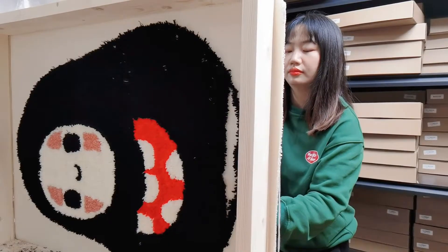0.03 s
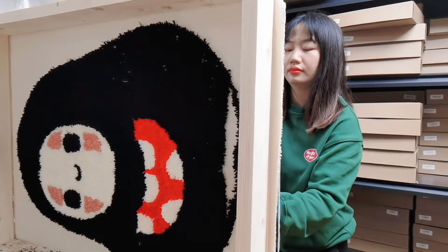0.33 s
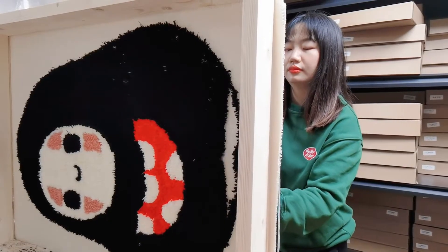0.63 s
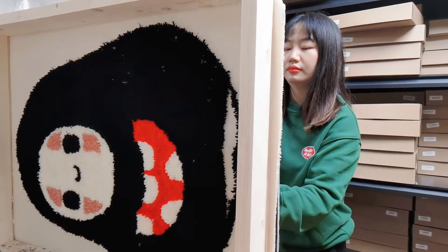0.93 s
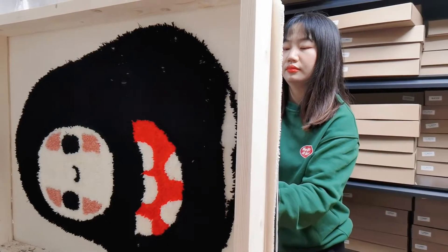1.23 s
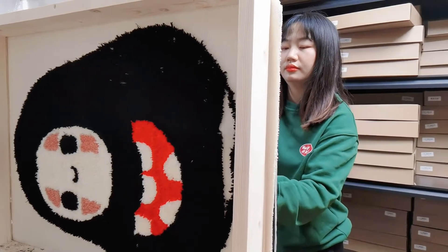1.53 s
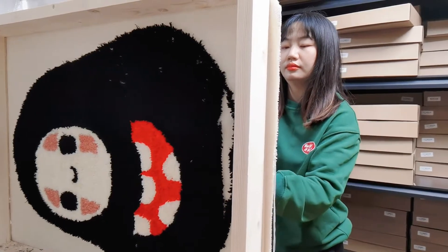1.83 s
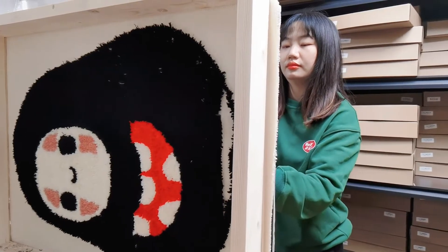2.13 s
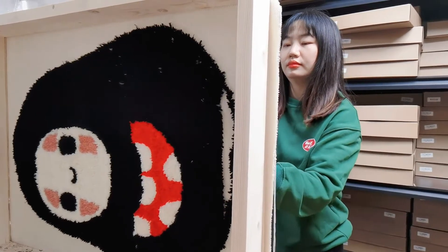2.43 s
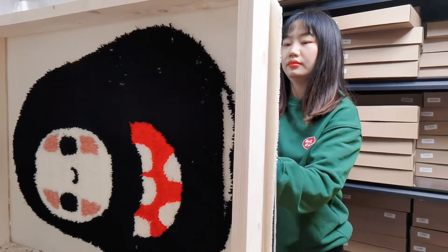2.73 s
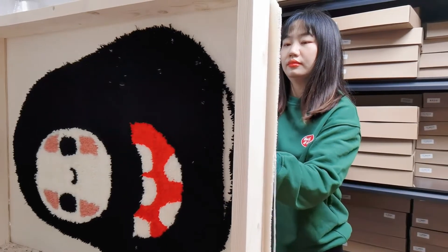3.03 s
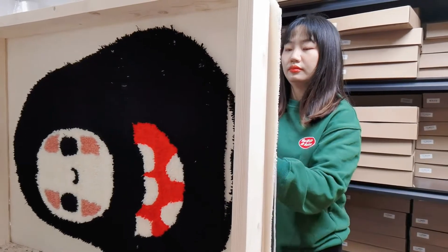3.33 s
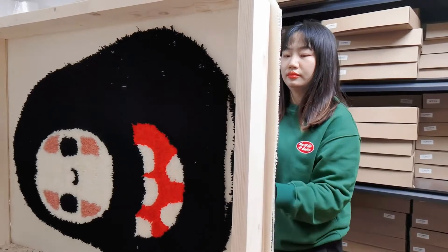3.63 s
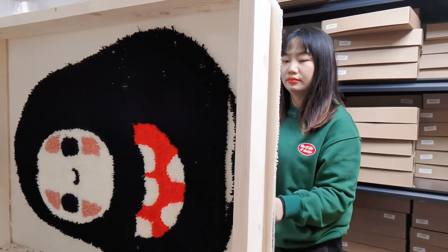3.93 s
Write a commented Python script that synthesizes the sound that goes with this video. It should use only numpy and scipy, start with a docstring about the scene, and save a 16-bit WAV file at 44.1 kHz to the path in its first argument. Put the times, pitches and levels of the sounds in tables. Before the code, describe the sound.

An electric tufting gun thumps and rattles rapidly, then stops dead with a knock.

```python
"""Rapid thumping and rattling, about 14 strokes a second: an electric tufting gun in a small room.
Each stroke punches yarn through cloth on a wooden frame, draws short whines from the gears,
clacks the linkage and snips the yarn, over a whirring motor. The gun knocks a few times,
bumps the frame and stops dead near 3.1 s with a brief steel ring; faint handling taps follow."""
import sys
import numpy as np
from scipy import signal
from scipy.fft import rfft, irfft
from scipy.io import wavfile
from scipy.ndimage import uniform_filter1d

SR = 44100
rng = np.random.default_rng(int(sys.argv[2]) if len(sys.argv) > 2 else 0)


def materialize(psi):
    """Save the field psi as 16-bit PCM at rate SR to the path in sys.argv[1].

    A 1-D psi becomes a single channel; in a 2-D psi each row is a channel.
    """
    bounded = np.clip(np.atleast_2d(psi).T, -1, 1)
    quanta = np.round(bounded * 32767).astype(np.int16)
    wavfile.write(sys.argv[1], SR, quanta)


N = 176400
STALL_S, STOP_S, RUN_DOWN_S = 3.08, 3.118, 0.0056


def undb(db):
    """Decibels to gain."""
    return 10 ** (np.asarray(db) / 20)


def unit(x):
    """Scale to rms 1."""
    return x / np.sqrt(np.mean(x ** 2))


def curve(table, column=1):
    """One table column, interpolated over time."""
    rows = np.array(table)
    return np.interp(np.arange(N) / SR, rows[:, 0], rows[:, column])


def colour(x, points):
    """Minimum-phase filter through (Hz, dB) points."""
    size = 2048
    rows = np.array(points)
    hz = np.maximum(np.arange(size // 2 + 1) * SR / size, 1)
    gain_db = np.interp(np.log(hz), np.log(rows[:, 0]), rows[:, 1])
    cepstrum = irfft(np.log(undb(gain_db)))
    cepstrum[1:size // 2] *= 2
    cepstrum[size // 2 + 1:] = 0
    return signal.fftconvolve(x, irfft(np.exp(rfft(cepstrum))))[:len(x)]


def noise(points):
    """Coloured noise, rms 1."""
    return unit(colour(rng.standard_normal(N), points))


def puffs(envelope, points):
    """Noise under an envelope, coloured afterwards so dull sounds start softly."""
    white = rng.standard_normal(N)
    return colour(envelope * white, points) / np.std(colour(white, points))


def band(x, hz, width_hz):
    """One resonance, gain 1 at centre."""
    return signal.lfilter(*signal.iirpeak(hz, hz / width_hz, fs=SR), x)


def tone(hz):
    """Sine along a pitch curve, rms 1."""
    return np.sqrt(2) * np.sin(2 * np.pi * np.cumsum(hz) / SR)


def walk(rate_hz):
    """Smooth random drift, rms 1."""
    span = max(int(SR / rate_hz), 1)
    return unit(uniform_filter1d(uniform_filter1d(rng.standard_normal(N), span), span))


def burst(t, start_s, decay_s):
    """Sudden start, exponential fade."""
    return (t >= start_s) * np.exp(-np.maximum(t - start_s, 0) / decay_s)


def near(stroke, phase):
    """Signed distance in strokes to a phase (0 to 1) of the cycle."""
    return (stroke - phase + .5) % 1 - .5


def bell(stroke, phase, width):
    """Smooth swell around one phase of each stroke."""
    return np.exp(-.5 * (near(stroke, phase) / width) ** 2)


def accent(stroke, spread_db):
    """Random gain, held for each stroke."""
    gains = undb(spread_db * rng.standard_normal(N // 100))
    return gains[np.floor(stroke + .1).astype(int)]


# Background spectrum. Each row: frequency in Hz, relative level in dB.
ROOM_TONE_SPECTRUM = [(18, -37.5), (30, -6), (75, -1), (176, -15), (426, -26), (597, -31.5), (1300, -35.5),
                      (2700, -43), (15000, -51)]

def room_tone():
    """Faint low rumble, mostly common to both ears."""
    common = noise(ROOM_TONE_SPECTRUM)
    return undb(-70) * np.array([common + .4 * noise(ROOM_TONE_SPECTRUM) for _ in range(2)])


def tail(t, t60_s):
    """Dense decaying echoes, unit energy."""
    age_s = t[:SR // 2]
    echoes = rng.standard_normal(len(age_s)) * np.exp(-np.log(1000) * age_s / t60_s) * (age_s > .002)
    return echoes / np.sqrt(np.sum(echoes ** 2))


# Long-tail filter. Each row: frequency in Hz, relative gain in dB.
BOOM_SPECTRUM = [(60, 5), (170, -5.5), (300, -4), (900, -1), (2000, -13), (8000, -43.5)]

def boom(x, t):
    """The room's long, dull tail."""
    return undb(-22) * colour(signal.fftconvolve(x, tail(t, t60_s=0.77))[:N], BOOM_SPECTRUM)


# Reflection filter. Each row: frequency in Hz, relative gain in dB.
WALL_SPECTRUM = [(40, -27.5), (140, -16), (300, -11), (600, -5), (1400, 0), (3000, 3), (6000, 9),
                 (15000, 10)]

def walls(x, t, parts=1):
    """Short bright tail; each part of the gun has its own paths to the walls."""
    part = rng.integers(0, parts, N)
    wet = sum(signal.fftconvolve(x * (part == k), tail(t, t60_s=0.21))[:N] for k in range(parts))
    return undb(-1.5) * colour(wet, WALL_SPECTRUM)


# Handling taps. Each row: start in seconds, level in dB, decay in seconds.
TAPS = [(3.284, -50, 0.024), (3.335, -54, 0.014), (3.367, -49.5, 0.017), (3.445, -46, 0.011),
        (3.525, -59, 0.018), (3.565, -55.5, 0.029), (3.592, -67, 0.058)]
# Gun ticks. Each row: start in seconds, level in dB.
TICKS = [(3.648, -72), (3.747, -68)]
# Their spectra. Each row: frequency in Hz, relative level in dB.
TAP_SPECTRUM = [(50, 12), (150, 13), (250, -6), (450, 1), (900, -7), (1500, -18), (2200, -33), (8000, -60)]
TICK_SPECTRUM = [(800, -3), (1800, -12), (2400, 1), (3300, -17.5), (5500, -6), (8000, -31), (16000, -30)]

def handling(t):
    """Handling the stopped gun gives soft taps, then two small ticks."""
    taps = sum(undb(db) * burst(t, start_s, decay_s) for start_s, db, decay_s in TAPS)
    ticks = sum(undb(db) * burst(t, start_s, decay_s=0.00206) for start_s, db in TICKS)
    return puffs(taps, TAP_SPECTRUM) + puffs(ticks, TICK_SPECTRUM)


# Needle bar modes. Each row: frequency in Hz, level in dB, T60 in seconds.
BAR_MODES = [(1270, -37, .2), (2520, -48.5, 0.23), (3560, -42, .21), (3620, -47, .22), (5470, -44.5, .11),
             (5940, -35.5, 0.14), (5990, -43.5, .11)]

def needle_bar(t, start_s=3.117):
    """The jolt of the stop leaves the steel ringing briefly."""
    return sum(undb(db) * burst(t, start_s, t60_s / np.log(1000)) * tone(hz * (1 + .002 * walk(140)))
               for hz, db, t60_s in BAR_MODES)


# Motor whines. Each row: time in seconds, lower pitch in Hz, its relative level in dB,
# upper pitch in Hz, its relative level in dB.
MOTOR_WHINES = [(0, 2105, -48.5, 2900, -48), (1.65, 2121, -43.5, 2870, -49), (1.9, 2121, -45, 2905, -36),
                (2.3, 2120, -45, 2917, -37), (2.7, 2118, -39, 2965, -37), (3.1, 2110, -40.5, 2975, -38.5)]

def motor():
    """Two thin, wavering whines that grow in the second half."""
    lower = tone(curve(MOTOR_WHINES, 1) * (1 + .002 * walk(60))) * undb(curve(MOTOR_WHINES, 2))
    upper = tone(curve(MOTOR_WHINES, 3) * (1 + .007 * walk(150))) * undb(curve(MOTOR_WHINES, 4))
    flutter = unit(undb(3.1 * walk(40)))
    return (lower + upper) * flutter


# Running levels. Each row: time in seconds, then relative level in dB of cloth thump, gear whine,
# linkage rattle, frame buzz, frame ring, metal ring.
RUN_LEVELS = [(0, -2.5, -33, -28.5, -35.5, -2, -38), (.7, -2, -33, -30, -36, -2, -40.5),
              (1.3, -3, -33.5, -29, -34.5, -2.5, -38.5), (1.8, .5, -33.5, -30.5, -33.5, -0.5, -39),
              (2.3, -0.5, -31.5, -30, -32, 2, -34.5), (2.8, -1, -30, -29, -32.5, 2.5, -36.5),
              (3.1, 0.5, -33.5, -30.5, -30.5, 2, -34.5)]
CLOTH_COL, GEAR_COL, RATTLE_COL, BUZZ_COL, FRAME_COL, METAL_COL = range(1, 7)
# Frame buzz spectrum. Each row: frequency in Hz, relative level in dB.
BUZZ_SPECTRUM = [(100, 5), (180, -3), (260, -0.5), (340, -7), (600, -12), (900, -11.5), (1500, -25)]
SWELL_PHASE = 0.25

def frame_buzz(stroke):
    """The frame buzzes low, swelling slightly once a stroke."""
    swell = 1 + 0.083 * np.cos(2 * np.pi * near(stroke, SWELL_PHASE))
    return undb(curve(RUN_LEVELS, BUZZ_COL)) * swell * noise(BUZZ_SPECTRUM)


# Gun speed. Each row: time in seconds, strokes per second.
STROKE_RATE = [(0, 13.927), (.3, 14.211), (.7, 13.936), (1.25, 14.021), (1.42, 13.502), (1.8, 13.769),
               (2.05, 13.988), (2.25, 13.801), (3.1, 13.747)]
# Scissor strength. Each row: time in seconds, relative level in dB.
SNIP_LEVELS = [(0, -21), (.6, -20), (1.0, -22), (1.4, -19.5), (1.55, -21), (2.2, -21), (3.1, -23)]
# Blade spectrum. Each row: frequency in Hz, relative level in dB.
SNIP_SPECTRUM = [(1000, -16.5), (2700, -10), (6500, -3.5), (9000, -12.5), (13000, -6), (15200, -5),
                 (16000, -3.5)]

def scissors(stroke, shut_phase=0.0023, open_phase=.44, decay_s=0.0028):
    """The blades snap shut once a stroke, scrape on, and reopen more softly."""
    since_shut_s = (stroke - shut_phase) % 1 / curve(STROKE_RATE)
    since_open_s = (stroke - open_phase) % 1 / curve(STROKE_RATE)
    snap = np.exp(-since_shut_s / decay_s) * undb(curve(SNIP_LEVELS)) * accent(stroke, spread_db=.5)
    scrape = undb(-43) * np.exp(-since_shut_s / 0.006)
    reopen = undb(-44) * np.exp(-since_open_s / decay_s)
    return np.hypot(snap, scrape + reopen) * noise(SNIP_SPECTRUM)


# Linkage turning points. Each row: phase in strokes, width in strokes, relative strength.
CLACKS = [(.34, .035, 1.0), (.52, .025, .55), (.8, .035, .7)]

def clacks(stroke):
    """Envelope of the linkage clacking as it turns, accented anew each stroke."""
    return sum(strength * bell(stroke, phase, width) * accent(stroke, spread_db=3)
               for phase, width, strength in CLACKS)


# Gear loads. Each row: phase in strokes, width in strokes, relative strength.
GEAR_LOADS = [(.07, .038, .44), (.285, .057, 1.0), (.53, .042, .33), (.8, .055, .6)]
# Load delay. Each row: time in seconds, lag in strokes.
LOAD_LAG = [(0, 0), (1.3, 0), (2.0, .05), (3.1, .06)]
# Side partials. Each row: multiple of the mesh pitch, relative level in dB.
SIDE_TONES = [(2 / 3, -19), (4 / 3, -17)]
# Drive whirr, sinking under load. Each row: time in seconds, centre in Hz, relative level in dB.
DRIVE_WHIRR = [(0, 2730, -38.5), (.6, 2770, -35), (1.0, 2702, -34.5), (1.4, 2552, -36.5),
               (1.85, 2414, -35.5), (2.2, 2426, -38), (2.6, 2712, -37.5), (3.1, 2766, -36.5)]

def gears(t, stroke, teeth=98, roughness=.015, stall_sag_per_s=2.7):
    """Four loads a stroke draw falling whines from the teeth; the drive whirrs in hoarse chirps."""
    cycle = stroke - curve(LOAD_LAG)
    load = .04  # idle
    bend = .014 * np.cos(2 * np.pi * near(cycle, 0.18)) + roughness * walk(520)
    for phase, width, strength in GEAR_LOADS:
        swell = bell(cycle, phase, width)
        load += strength * swell * accent(cycle, spread_db=1.5)
        bend -= .04 * near(cycle, phase) / width * swell
    load = unit(load * undb(1.5 * walk(290)))
    stall = np.clip(1 - stall_sag_per_s * (t - STALL_S), 0, 1)
    mesh_hz = teeth * curve(STROKE_RATE) * stall * (1 + bend)
    sides = sum(undb(db) * tone(k * mesh_hz * (1 + roughness * walk(300))) for k, db in SIDE_TONES)
    mesh = load * (tone(mesh_hz) + sides)
    whirr_hz = curve(DRIVE_WHIRR) * (1 + .8 * bend + .028 * walk(800)) + 40 * walk(30)
    whirr = unit(tone(whirr_hz) * (.4 + clacks(stroke)))
    return undb(curve(RUN_LEVELS, GEAR_COL)) * mesh + undb(curve(DRIVE_WHIRR, 2)) * whirr


# Gun metal modes. Each row: frequency in Hz, bandwidth in Hz, gain in dB.
METAL_MODES = [(1915, 90, -13), (2350, 50, -4), (2478, 14, 0), (2720, 70, -4.5), (2900, 50, -0.5),
               (2975, 35, -2.5), (3290, 77, -2), (3494, 67, 3.5), (3660, 22, -4), (4684, 60, -11)]

def gun_metal(x):
    """The gun's metal rings at its modes when shaken."""
    return sum(undb(db) * band(x, hz, width_hz) for hz, width_hz, db in METAL_MODES)


# Rattle spectrum. Each row: frequency in Hz, relative level in dB.
RATTLE_SPECTRUM = [(300, -20), (700, -14), (900, 3.5), (1150, 4.5), (1600, 2), (2500, 4), (4000, -1),
                   (6500, -3.5), (8700, -17), (11500, -11), (15000, -11), (16000, -5.5)]

def linkage(t, stroke, running, clicks_per_s=1400):
    """Loose parts click densely and ring the gun's metal; stereo, heard mostly off the walls."""
    clicks = (rng.random(N) < clicks_per_s / SR) * rng.standard_normal(N)
    swell = 1 + 0.23 * np.cos(2 * np.pi * near(stroke, SWELL_PHASE)) + .45 * clacks(stroke)
    chatter = unit(clicks) + .6 * rng.standard_normal(N)
    grain = undb(1.3 * walk(260))
    drive = chatter * swell * grain * running
    ears = [drive + undb(2.5) * walls(drive, t, parts=6) for _ in range(2)]
    rattle_gain = undb(curve(RUN_LEVELS, RATTLE_COL)) / np.std(colour(drive, RATTLE_SPECTRUM))
    metal_gain = undb(curve(RUN_LEVELS, METAL_COL)) / np.std(gun_metal(drive))
    return np.array([rattle_gain * colour(x, RATTLE_SPECTRUM) + metal_gain * gun_metal(x) for x in ears])


# Gun knocks. Each row: start in seconds, then relative level in dB of thud, crack, clang.
KNOCKS = [(1.5291, -31, -16, -13), (1.767, -48, -27.5, -12), (1.806, -36.5, -27, -10.5),
          (1.896, -43, -29.5, -9.5), (2.179, -29, -31, -16.5), (2.7596, -19, -17.5, -13.5),
          (2.766, -17.5, -26, -23.5), (2.908, -33.5, -29.5, -21.5), (3.102, -13.5, -25, -23.5)]
# Wood under the two heaviest knocks. Each row: start in seconds, level in dB, decay in seconds.
CLUNKS = [(2.761, -26.5, .012), (3.102, -22.5, 0.026)]
# Their spectra. Each row: frequency in Hz, relative level in dB.
THUD_SPECTRUM = [(100, -24.5), (250, -1.5), (480, 12), (800, 6), (1500, -4.5), (3000, -13.5), (6000, -16),
                 (10000, -33.5), (16000, -42.5)]
CRACK_SPECTRUM = [(300, -25.5), (800, -2), (1500, -2), (2600, 0.5), (3500, -5.5), (5000, -11), (9000, -20),
                  (16000, -29)]
CLUNK_SPECTRUM = [(120, -21.5), (230, 4.5), (420, 5), (600, -3.5), (850, -5.5), (1200, -11.5),
                  (2200, -24.5), (8000, -54)]

def knocks(t, knock_decay_s=0.0032, crack_decay_s=0.0026):
    """Hard knocks thud, crack and clang in the gun's metal; the heaviest clunk in the wood."""
    thud = sum(undb(db) * burst(t, start_s, knock_decay_s) for start_s, db, _, _ in KNOCKS)
    crack = sum(undb(db) * burst(t, start_s, crack_decay_s) for start_s, _, db, _ in KNOCKS)
    clang = sum(undb(db) * burst(t, start_s, knock_decay_s) for start_s, _, _, db in KNOCKS)
    clunk = sum(undb(db) * burst(t, start_s, decay_s) for start_s, db, decay_s in CLUNKS)
    return (puffs(thud, THUD_SPECTRUM) + puffs(crack, CRACK_SPECTRUM)
            + gun_metal(clang * rng.standard_normal(N)) + puffs(clunk, CLUNK_SPECTRUM))


def push(since_s, width_ms):
    """Soft inward push, same impulse at any width."""
    return -np.exp(-.5 * (since_s * 1000 / width_ms) ** 2) / (width_ms * np.sqrt(2 * np.pi))


# Cloth pushes: needle in, needle back out. Each row: phase in strokes, relative level in dB.
PUSHES = [(0.026, 0), (0.222, -2.5)]
# Foot bumps on the frame. Each row: time in seconds, relative level in dB, contact width in ms.
FOOT_BUMPS = [(0.35, 5.5, 1.15), (0.355, 0, 0.77), (3.096, 9.5, 0.92), (3.102, 11.5, 0.63),
              (3.109, 7, 0.64), (3.117, 11, .8)]
# Wooden frame modes. Each row: frequency in Hz, bandwidth per pass in Hz, gain in dB.
FRAME_MODES = [(138.2, 21.5, 0), (157.4, 18, -2.5), (280, 26, -9.5), (417, 19, -9.5)]

def cloth_and_frame(t, stroke, cloth_hz=59, cloth_width_hz=49.6):
    """Two pushes a stroke drum the cloth and set the frame humming; bumps go mainly into the wood."""
    force = sum(undb(db) * push(near(stroke, phase) / curve(STROKE_RATE), width_ms=1)
                * accent(stroke, spread_db=.5) for phase, db in PUSHES)
    force *= t < STALL_S
    bumps = sum(undb(db) * push(t - at_s, width_ms) for at_s, db, width_ms in FOOT_BUMPS)
    on_cloth = force * undb(curve(RUN_LEVELS, CLOTH_COL)) + undb(-10.5) * bumps
    on_frame = force * undb(curve(RUN_LEVELS, FRAME_COL)) + undb(-2) * bumps
    # Two passes per resonance slow the attack.
    cloth = band(band(on_cloth, cloth_hz, cloth_width_hz), cloth_hz, cloth_width_hz)
    frame = sum(undb(db) * band(band(on_frame, hz, width), hz, width) for hz, width, db in FRAME_MODES)
    return undb(0.5) * cloth + frame


def scene():
    """The gun runs and stops, heard directly and off the walls, over a quiet room."""
    t = np.arange(N) / SR
    stroke = np.cumsum(curve(STROKE_RATE)) / SR
    running = np.exp(-np.maximum(t - STOP_S, 0) / RUN_DOWN_S)
    noises = undb(-3.5) * running * (frame_buzz(stroke) + scissors(stroke))
    noises += cloth_and_frame(t, stroke) + knocks(t) + handling(t)
    tones = undb(-2.5) * running * (gears(t, stroke) + motor()) + needle_bar(t)
    direct = noises + tones
    ears = room_tone() + undb(-8.5) * linkage(t, stroke, running)
    for ear in ears:
        ear += direct + boom(direct, t) + walls(noises + undb(-7) * tones, t)
    return ears * undb([[0.6], [-0.6]])  # slightly left


def record(dry):
    """Steep low-pass at 15.7 kHz."""
    return signal.sosfilt(signal.ellip(10, .2, 80, 15700, fs=SR, output="sos"), dry)


dry = scene()
out = record(dry)
materialize(out)
```